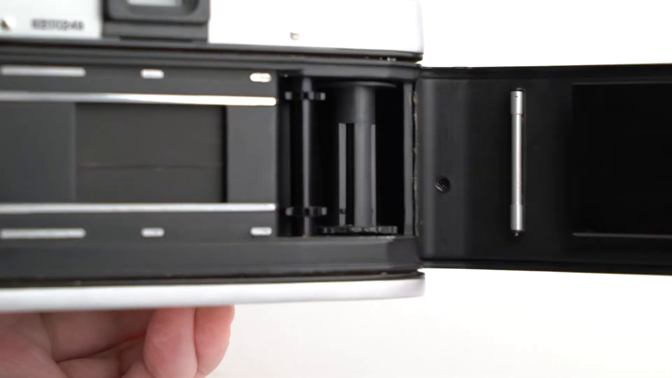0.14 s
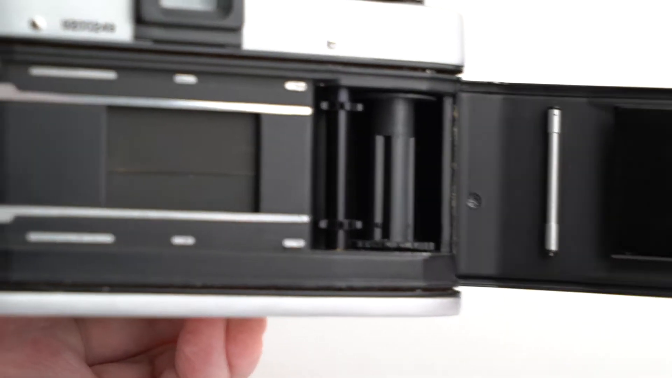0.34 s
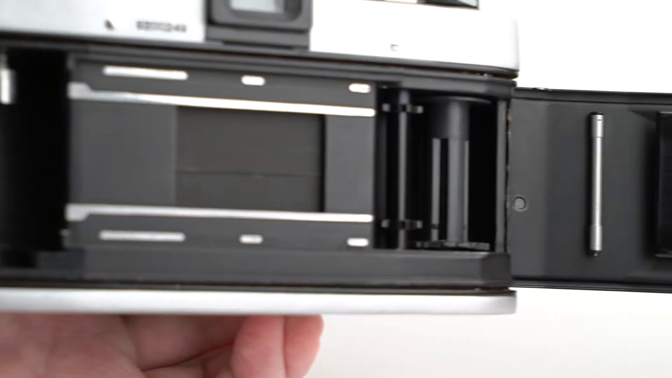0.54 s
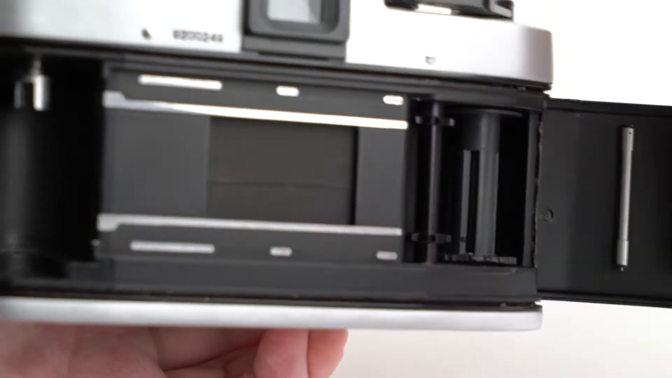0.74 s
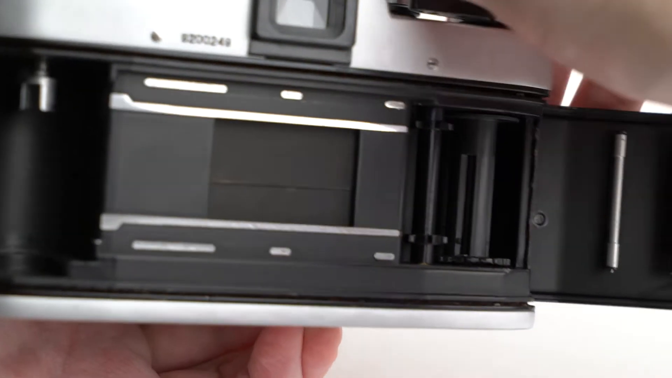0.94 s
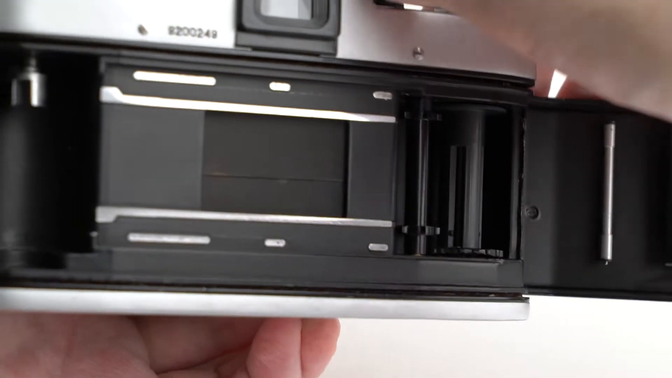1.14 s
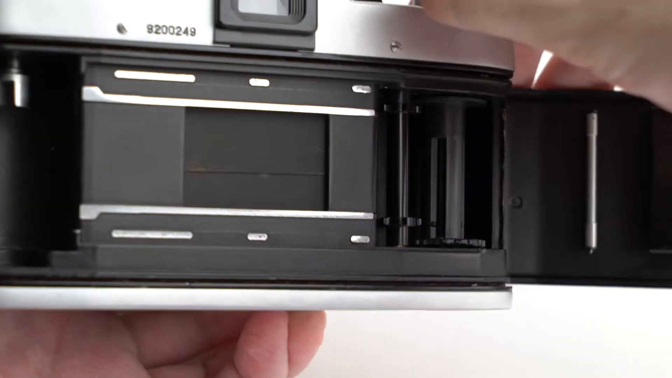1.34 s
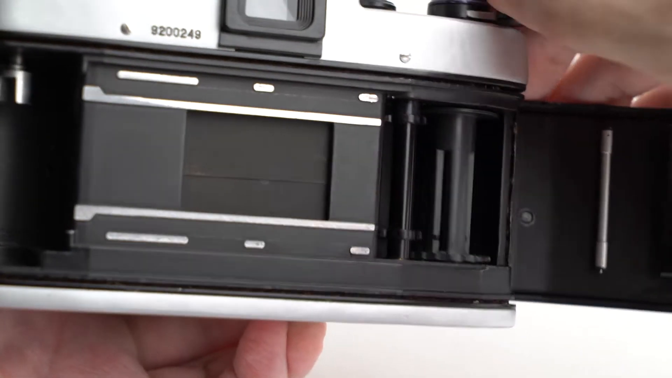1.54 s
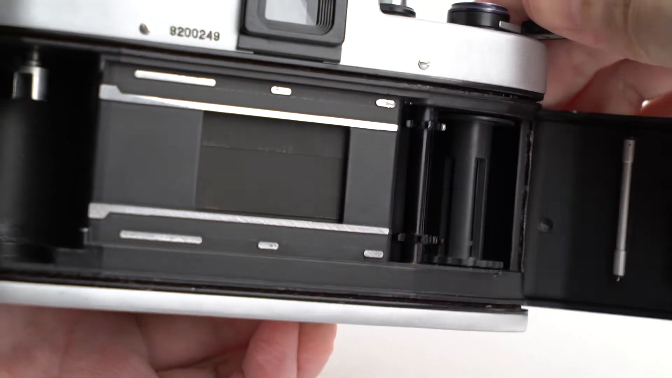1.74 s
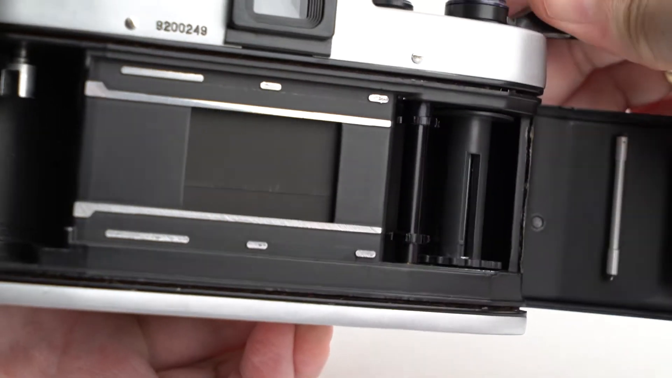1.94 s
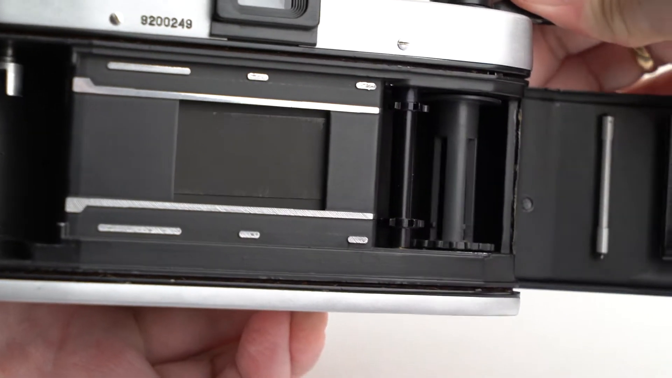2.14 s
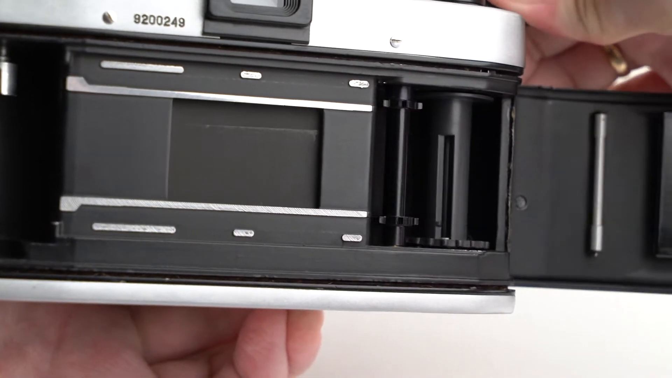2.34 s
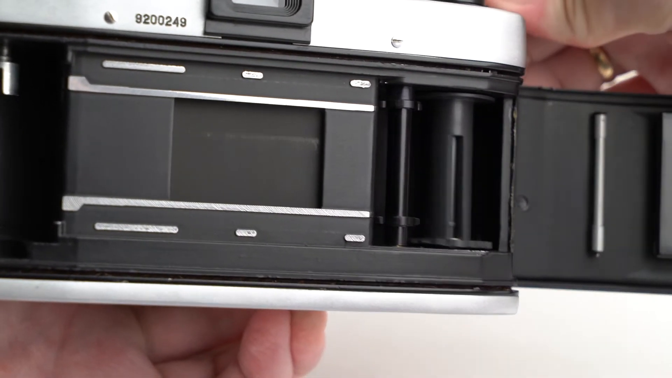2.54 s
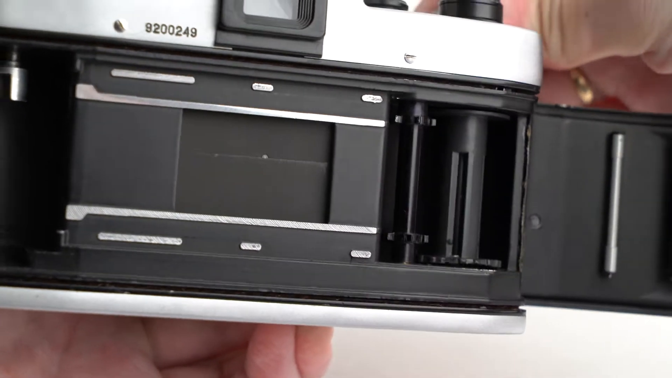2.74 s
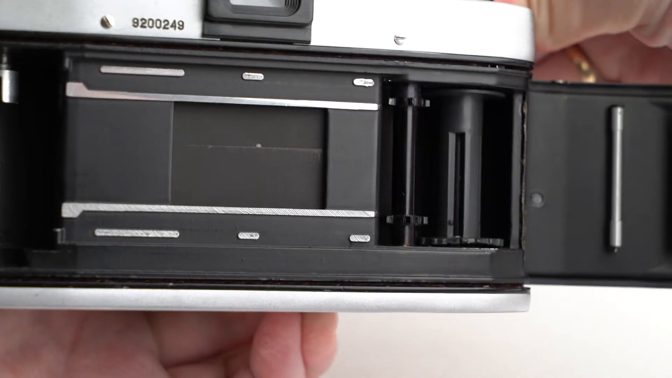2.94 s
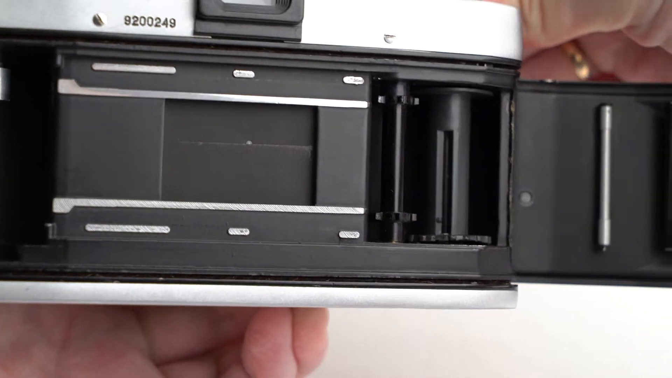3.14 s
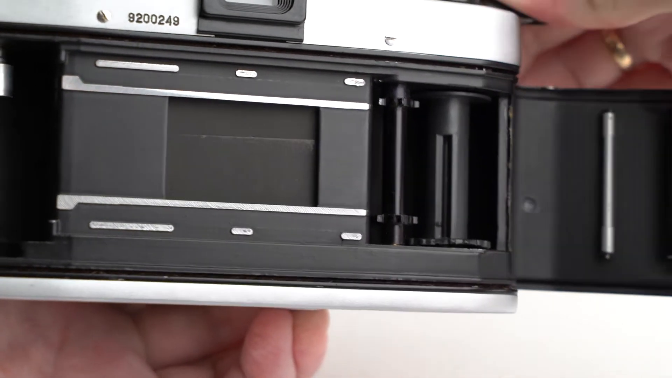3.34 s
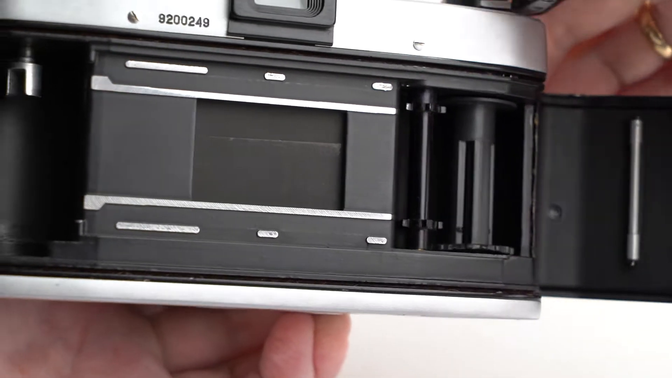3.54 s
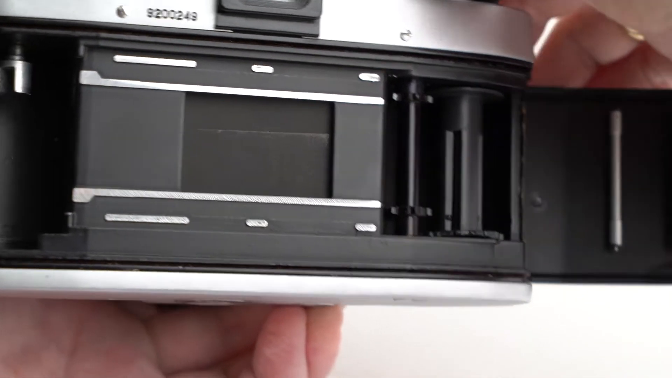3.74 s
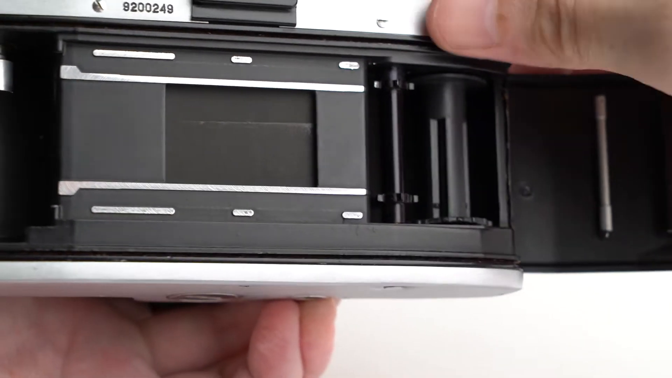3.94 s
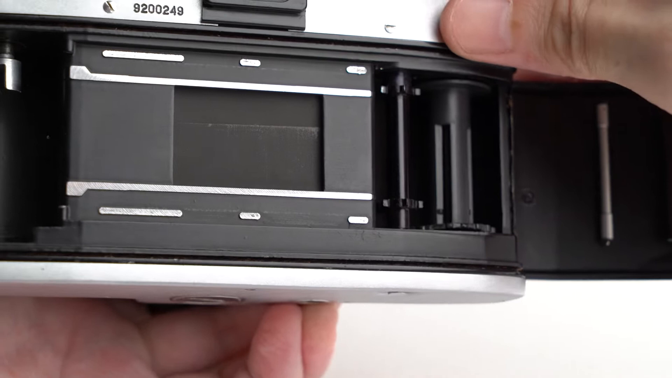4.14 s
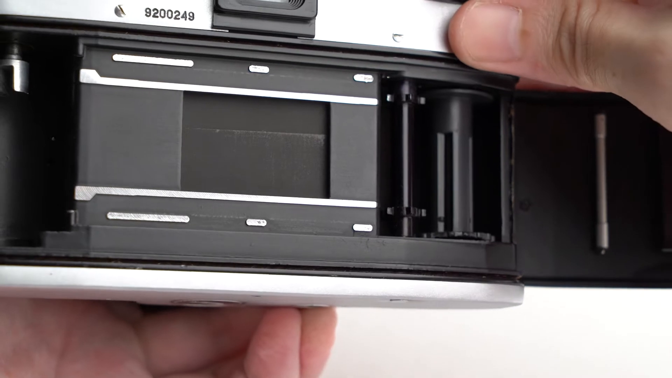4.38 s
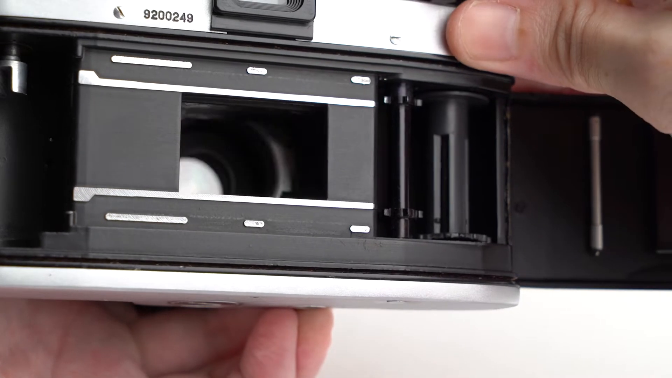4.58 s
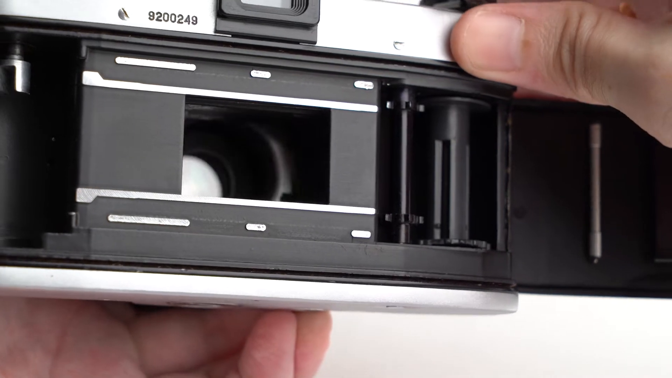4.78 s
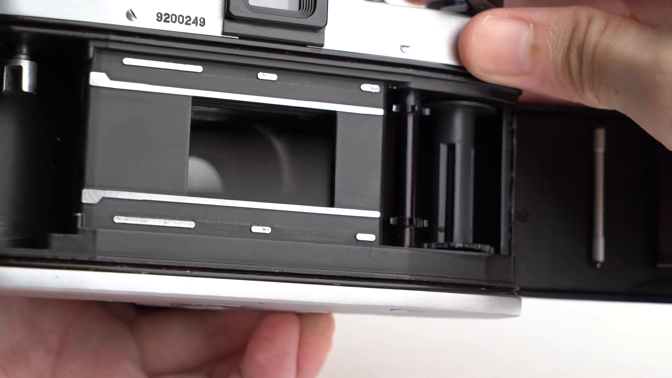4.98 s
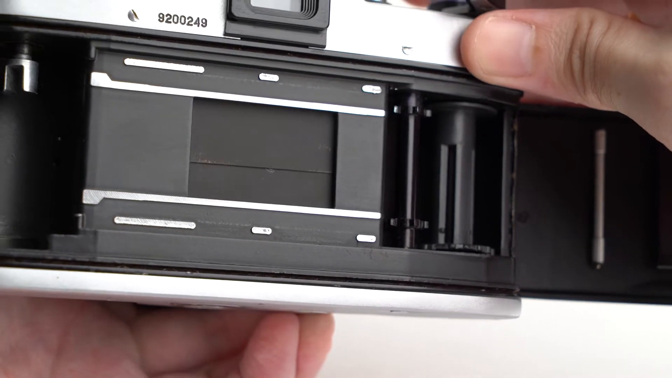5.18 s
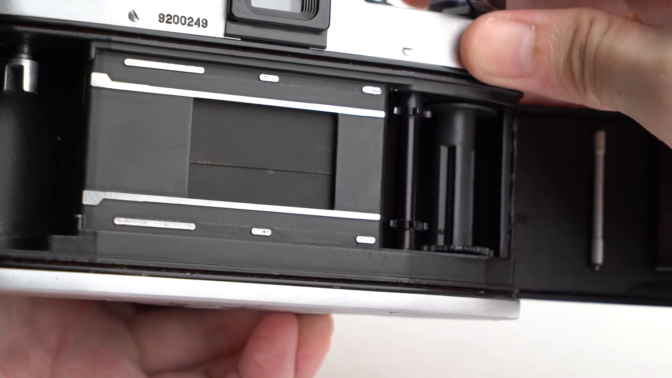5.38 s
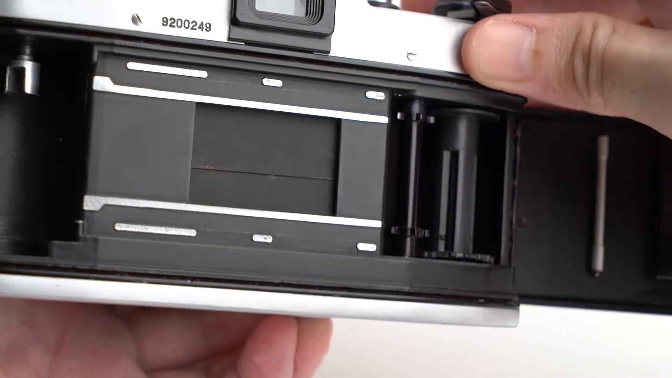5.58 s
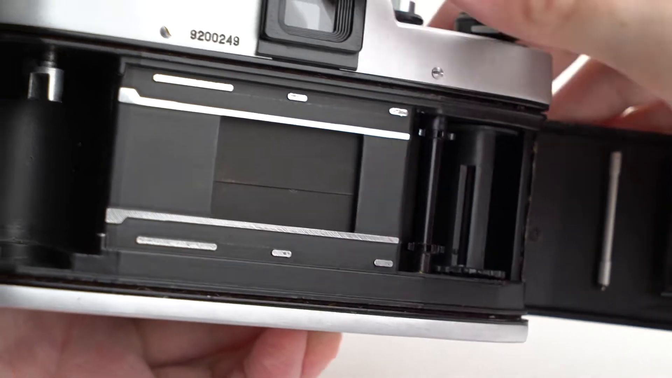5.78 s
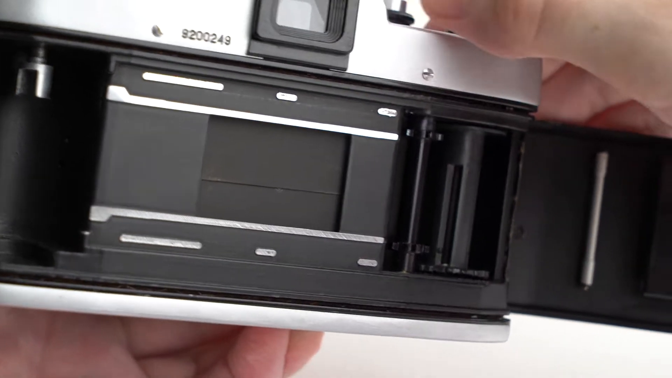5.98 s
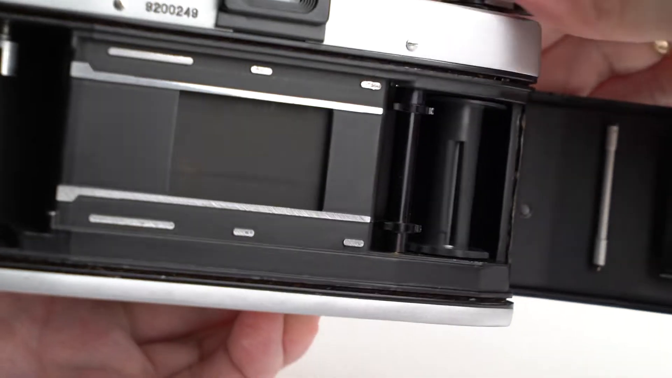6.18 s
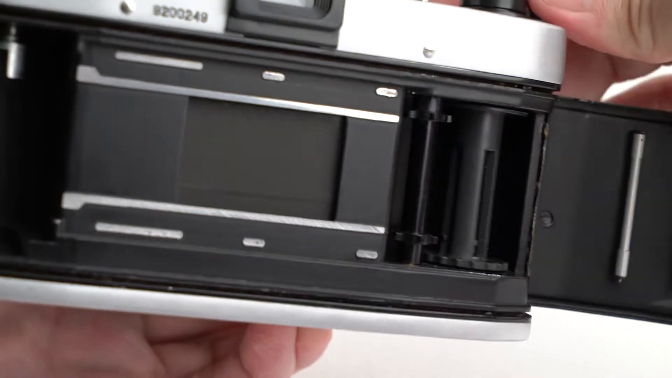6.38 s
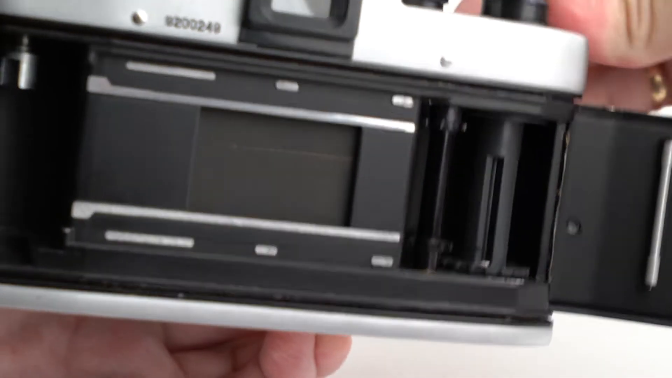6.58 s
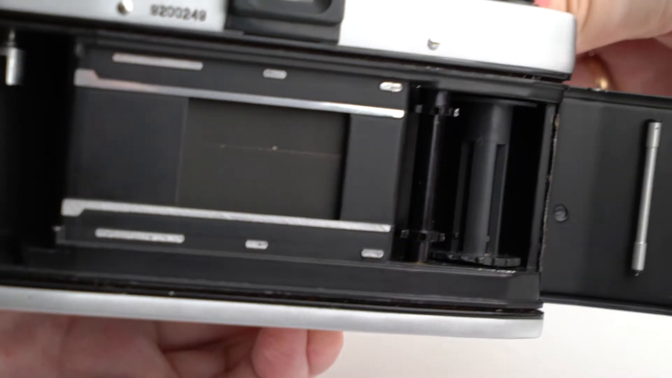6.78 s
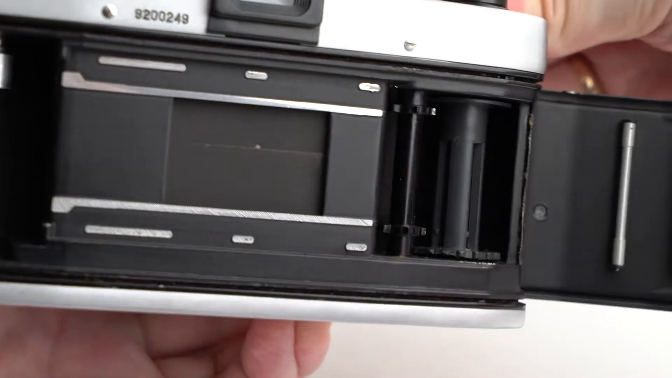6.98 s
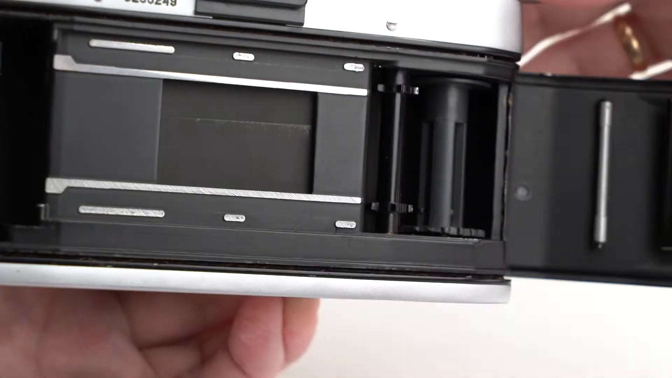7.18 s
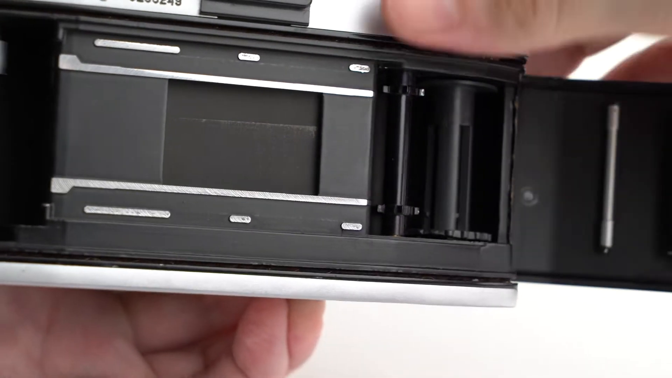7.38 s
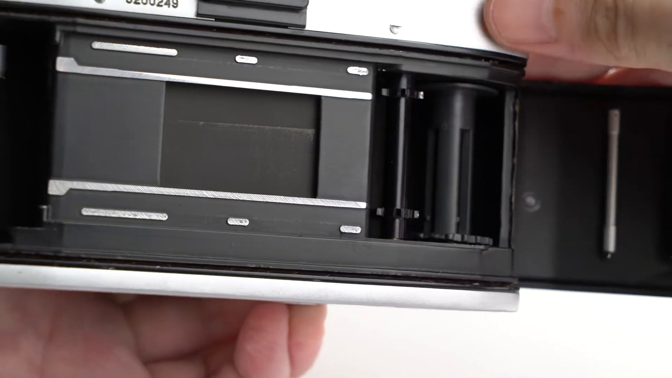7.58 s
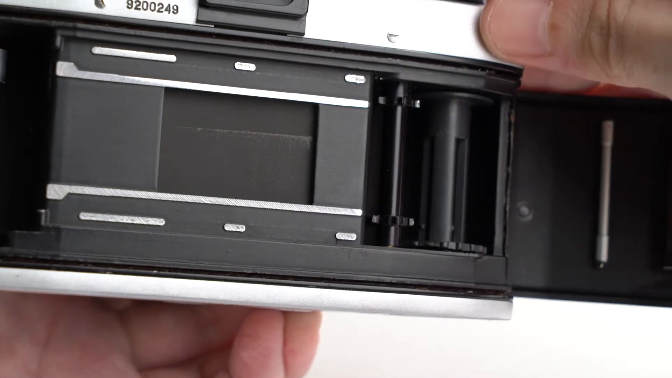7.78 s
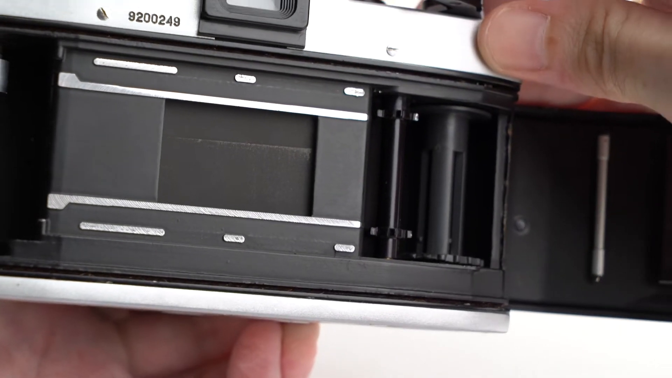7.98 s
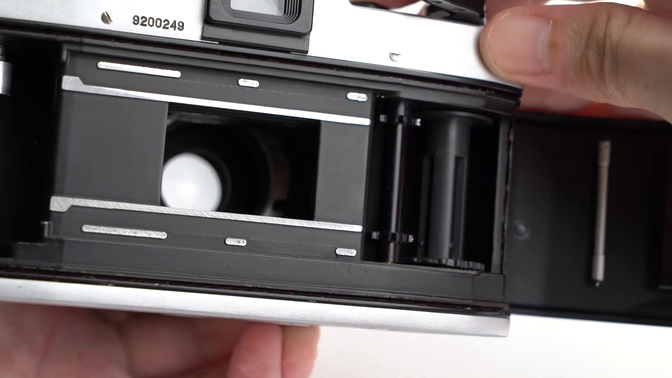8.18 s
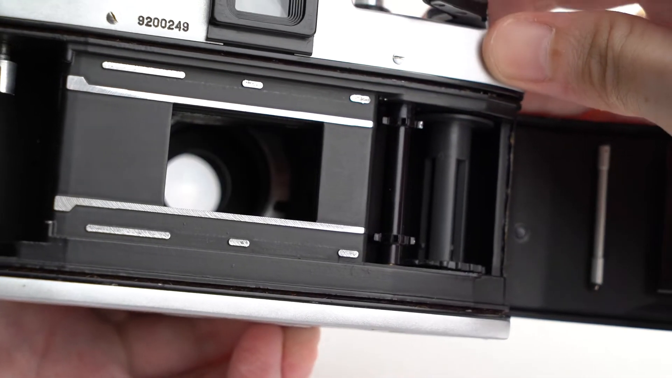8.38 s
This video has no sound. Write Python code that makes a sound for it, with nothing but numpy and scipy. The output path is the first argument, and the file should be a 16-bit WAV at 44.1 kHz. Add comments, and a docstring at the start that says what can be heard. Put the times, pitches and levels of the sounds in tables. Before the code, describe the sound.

A film camera's lever ratchets slowly, then briskly, and its shutter claps open and shut; a second wind ends with another shutter snap.

```python
"""Winding and firing a film camera

A metal film camera with its back open is wound, fired, wound and fired again, close by in a quiet, live room.
Pawl, mirror and blade clicks are noise bursts through body resonances; the lever's stop rings decaying sines.
Gears, timer and scraping are unsteady coloured noise; the spring hum and body knocks are sines.
Hands brush and tick on the body; ventilation rumbles far away as low noise under hiss."""
import sys
import numpy as np
from scipy import signal
from scipy.fft import rfft, irfft, next_fast_len
from scipy.io import wavfile
from scipy.ndimage import uniform_filter1d, map_coordinates

SR = 44100
rng = np.random.default_rng(int(sys.argv[2]) if len(sys.argv) > 2 else 0)


def bounce(signal):
    """Save signal as a 16-bit WAV file at the path given by the first command-line argument."""
    frames = np.transpose(np.atleast_2d(signal))
    limited = np.clip(frames, -1, 1)
    pcm = np.round(limited * 32767).astype(np.int16)
    wavfile.write(sys.argv[1], SR, pcm)


N = 371322  # length in samples


def amp(db):
    """dB to gain."""
    return 10 ** (np.asarray(db) / 20)


def unit(x):
    """Scaled to rms 1."""
    return x / np.sqrt(np.mean(x ** 2) + 1e-20)


def along(points, hz):
    """Reads a curve of (Hz, value) points on a log frequency axis."""
    f, value = np.transpose(points)
    return np.interp(np.log(hz + 1), np.log(f + 1), value)


def level(*tables):
    """Gain per sample, summed over tables of (s, dB); silent outside them."""
    t = np.arange(N) / SR
    return sum(amp(np.interp(t, *np.transpose(rows), left=-200, right=-200)) for rows in tables)


def run_down(rows, engage_s=.015):
    """Gain of motions that engage quickly, hold and fade at a steady rate."""
    curves = []
    for s, db, held, lost_db, fade in rows:
        end_s, end_db = s + held, db - lost_db
        curves.append([(s - engage_s, db - 40), (s, db), (end_s, end_db), (end_s + 1, end_db - fade)])
    return level(*curves)


def wobble(rate):
    """A smooth random curve with the given number of knots a second."""
    knots = rng.standard_normal(int(N * rate / SR) + 4)
    return map_coordinates(knots, [np.arange(N) * rate / SR])


def filtered(x, response):
    """Shapes x by a response given as a function of frequency."""
    m = next_fast_len(x.shape[-1] + 8192)
    return irfft(rfft(x, m) * response(np.fft.rfftfreq(m, 1 / SR)), m)[..., :x.shape[-1]]


def rush(spectrum, alike):
    """Stereo noise of rms 1, coloured by a spectrum, with a left-right likeness for each frequency."""
    def mid_and_side(hz):
        turn = np.arccos(np.clip(along(alike, hz), -1, 1)) / 2
        return amp(along(spectrum, hz)) * [np.cos(turn), np.sin(turn)]

    mid, side = filtered(rng.standard_normal((2, N)), mid_and_side)
    return unit(np.array([mid + side, mid - side]))


def resonant(x, modes, dull_hz):
    """Rings x through slightly scattered causal resonances, cut steeply below the lowest; energy becomes 1."""
    f = np.fft.rfftfreq(x.shape[-1], 1 / SR)
    response = 0
    for k, (centre, width, db) in enumerate(modes):
        gain = amp(db + 1.5 * rng.standard_normal())
        band = 1j * f * width / (centre * centre - f * f + 1j * f * width)
        response = response + (-1) ** k * gain * band  # neighbours alternate in sign
    edge = .85 * modes[0][0]
    low_cut = (-f * f / (edge * edge - f * f + 1j * f * edge)) ** 2
    treble_cut = 1 / (1 + 1j * f / dull_hz)
    y = irfft(rfft(x) * response * low_cut * treble_cut, x.shape[-1])
    return y / np.linalg.norm(y, axis=-1, keepdims=True)


# body resonances that the clicks ring through: pitch_hz, width_hz, level_db (relative)
HOUSING_MODES = [(880, 300, -3), (1080, 350, -1), (1450, 500, 0), (1900, 600, 0)]
PLATE_MODES = [(2390, 520, -1), (2820, 1310, -3), (3620, 600, 2), (4190, 2120, -4)]
SMALL_PART_MODES = [(6350, 1600, -3.5), (8470, 2360, 0), (10480, 3500, 0.5), (12860, 2600, 3.5),
                    (15270, 7700, -5.5)]


def clicks(rows, rise, snap, t60s, shared, dull_hz):
    """Contacts as a sharp snap and a rattle into housing, plates and small parts; treble leans to one side."""
    t = np.arange(4096) / SR
    out = np.zeros((2, N + len(t)))
    rattle = amp(-60 * t / np.array(t60s)[:, None, None])
    fade = (1 - np.exp(-t / rise)) ** 2 * (rattle + snap * amp(-60 * t / .012))  # snap t60 12 ms
    fade /= fade.max(axis=2, keepdims=True)
    size = np.linalg.norm(fade, axis=2)
    share = np.clip(shared, 0, 1)[:, None, None]  # part of the noise common to left and right
    for s, db, housing_db, plates_db, pan_db in rows:
        common = rng.standard_normal((3, 1, len(t)))
        separate = rng.standard_normal((3, 2, len(t)))
        noise = np.sqrt(share) * common + np.sqrt(1 - share) * separate
        groups = amp([housing_db + 3.0, plates_db - .4, 0])[:, None]
        sides = amp(np.outer([.05, .5, 1.2], [pan_db / 2, -pan_db / 2]))  # small parts lean most
        gain = amp(db - 6.0) * groups / np.linalg.norm(groups[1:]) * sides * size
        start = round((s - rise) * SR)  # begins just before the listed moment
        for g, x, modes in zip(gain, fade * noise, (HOUSING_MODES, PLATE_MODES, SMALL_PART_MODES)):
            out[:, start:start + len(t)] += g[:, None] * resonant(x, modes, dull_hz)
    return out[:, :N]


def ring(rows, modes, pan_db):
    """Each blow rings the same decaying modes at new strengths and phases, with a short noise crack."""
    t = np.arange(SR // 2) / SR
    out = np.zeros((2, N + len(t)))
    for s, db in rows:
        tone = 0
        for hz, mode_db, t60 in modes:
            fade = amp(mode_db + rng.normal(0, 1.55, (2, 1)) - 60 * t / t60)
            tone = tone + fade * np.sin(2 * np.pi * (hz * t + rng.random((2, 1))))
        crack = .8 * amp(-60 * t / .04) * np.diff(rng.standard_normal((2, len(t) + 1)))
        attack = 1 - np.exp(-t / .001)
        out[:, round(s * SR):][:, :len(t)] += amp(db) * (tone + crack) * attack
    return out[:, :N] * amp([[pan_db / 2], [-pan_db / 2]])


# level of the low drones: time_s, deep_db, upper_db
RUMBLE_LEVELS = [(0.0, -66, -59), (0.4, -56, -49.5), (0.77, -61, -55.5), (0.87, -55, -53), (1.12, -61, -57),
                 (1.52, -56.5, -55.5), (2.44, -59.5, -53), (2.67, -47.5, -53), (2.77, -63, -50),
                 (3.21, -51, -53), (4.17, -64, -58), (4.27, -52, -49), (4.59, -58, -60), (7.22, -57, -53.5),
                 (7.27, -62, -53.5), (7.76, -54, -57), (8.21, -67, -59), (8.42, -60, -52)]
# spectra of deep drone, upper drone, and room air with microphone hiss: pitch_hz, level_db (per Hz, relative)
DEEP_SPECTRUM = [(15, -44), (25, -4), (40, -5), (54, 7), (68, 5.5), (90, -65)]
DRONE_SPECTRUM = [(55, -45), (72, -12.5), (86, 4.5), (100, -2.5), (115, -4.5), (150, -19), (210, -45)]
AIR_SPECTRUM = [(76, -25), (130, -4), (176, -10), (292, -8.5), (337, -12), (505, -11.5), (658, -15),
                (874, -13.5), (1230, -13), (1570, -19), (3610, -26), (15200, -30), (16500, -46)]
# stereo width of the air: pitch_hz, likeness (left to right, 1 = same)
AIR_LIKENESS = [(60, 1.0), (180, 0.91), (550, 0.53), (1650, 0.24), (4970, 0.039), (15000, 0.14)]


def background():
    """Ventilation as two low noise drones, nearly alike on both sides, over gently wavering air."""
    s, deep_db, upper_db = np.transpose(RUMBLE_LEVELS)
    alike = [(60, .998)]
    deep = level(np.c_[s, deep_db]) * rush(DEEP_SPECTRUM, alike)
    upper = level(np.c_[s, upper_db]) * rush(DRONE_SPECTRUM, alike)
    air = amp(-54.5 + 1.41 * wobble(3.287)) * rush(AIR_SPECTRUM, AIR_LIKENESS)
    return deep + upper + air


# how long the diffuse tail rings: pitch_hz, t60_s
TAIL_T60 = [(500, 1), (1300, 0.57), (3500, 0.66), (9000, 0.4), (15000, 0.37)]
# stereo width of the tail: pitch_hz, likeness (left to right, 1 = same)
TAIL_LIKENESS = [(400, 1), (1200, 0.79), (3000, 0.0068)]
WALL_S = .015  # delay of the first strong reflection


def room(x):
    """Echo from noise tails, each frequency dying at its own speed, redrawn every quarter second."""
    out, step = np.zeros((2, N + 2 * SR)), SR // 4
    for start in range(0, N, step):
        hz, t, z = signal.stft(rng.standard_normal((2, SR * 2 // 3)), SR, nperseg=256)
        alike = np.clip(along(TAIL_LIKENESS, hz), 0, 1)[:, None]  # long waves reach both sides together
        z[1] = alike * z[0] + np.sqrt(1 - alike ** 2) * z[1]
        diffuse = amp(-60 * t / along(TAIL_T60, hz)[:, None])
        near = .7 * amp(-60 * t / .13)  # quicker near reflections
        tail = signal.istft(z * (diffuse + near), SR, nperseg=256)[1]
        wet = signal.fftconvolve(x[:, start:start + step], tail / np.linalg.norm(tail[0]), axes=1)
        out[:, start + round(WALL_S * SR):][:, :wet.shape[1]] += wet
    return out[:, :N]


# fingers on the body: start_s, level_db, housing_db and plates_db (against the small parts); all relative
FINGER_TOUCHES = [(1.2623, -51, 9, 7), (1.281, -48, 8.5, 8), (4.231, -43.5, -4, 2), (7.1014, -49, -1, 11),
                  (7.894, -46, -1, 4)]
# a finger ring touches the top plate: start_s, level_db (relative)
RING_TAPS = [(1.0917, -47.5), (1.1475, -50.5)]
# ringing of the top plate: pitch_hz, level_db (relative), t60_s
TOP_PLATE_MODES = [(3880, 3, .024), (6400, 1.5, .028), (9900, 2.5, .028)]
# a hand slides over the body: time_s, level_db
BRUSH_LEVELS = [(0, -59), (.184, -59), (.24, -56), (.36, -46.5), (.41, -46.5), (.474, -58.5), (.62, -63),
                (.68, -80)]
# colour of skin on metal: pitch_hz, level_db (per Hz, relative)
SKIN_SPECTRUM = [(880, -6), (1500, 1), (1690, -2.5), (4500, -3.5), (5540, -2), (13900, -4), (16000, -10.5)]


def hands():
    """Soft finger contacts, a ring tapping metal and one brushing stroke of noise."""
    touch = clicks([(*row, -2.5) for row in FINGER_TOUCHES], rise=.0012, snap=.3,
                   t60s=[.05, .04, .03], shared=[.9, .6, .4], dull_hz=9000)
    taps = ring(RING_TAPS, TOP_PLATE_MODES, pan_db=-5.0)
    brush = level(BRUSH_LEVELS) * rush(SKIN_SPECTRUM, [(3000, 0.13)]) * amp([[-1.2], [1.2]])
    return touch + taps + brush


# a spring hums under load: peak_s, level_db (relative), swell_db_per_s, fade_db_per_s
SPRING_LOADS = [(1.898, -55, 116, 150), (2.044, -57, 95, 92), (2.31, -59, 102, 138), (2.62, -54, 85, 900),
                (3.42, -59, 200, 5), (3.67, -47, 26, 180), (6.434, -51, 178, 175), (6.656, -49, 125, 303),
                (7.276, -41.5, 185, 400)]
SPRING_HZ = 1155  # mean pitch
SPRING_REACH_S = 0.33  # length of each swell and fade


def spring():
    """A spring under tension hums as a sine with slightly unsteady pitch and a broken level."""
    phase = 2 * np.pi * np.cumsum(SPRING_HZ + 5 * wobble(30)) / SR
    r = SPRING_REACH_S
    swells = [[(s - r, db - swell * r), (s, db), (s + r, db - fade * r)] for s, db, swell, fade in SPRING_LOADS]
    return np.sqrt(2) * level(*swells) * amp(-6 + 3.5 * wobble(14)) * np.sin(phase)


# gears spin on and run down: full_speed_s, level_db (relative), held_s, lost_db (while held), fade_db_per_s
GEAR_RUNS = [(4.64, -27, 0.078, 4, 126), (5.09, -26.5, 0.086, 3, 121), (8.25, -31.5, 0.05, -2, 72)]
# the lever grinds through the end of a stroke: same columns, full_speed_s being the full level
LEVER_GRINDS = [(3.69, -50, 0.079, 7, 76), (6.64, -42, .14, 2.5, 200), (7.36, -32.5, 0.098, 3.3, 114)]
# the escapement holds the shutter open: time_s, level_db (relative)
TIMER_LEVELS = [(4.78, -70), (4.85, -48.5), (4.93, -45.5), (5.03, -37.5), (5.05, -70)]
# colours of gear train, escapement and lever scrape: pitch_hz, level_db (per Hz, relative)
WHIRR_SPECTRUM = [(450, -23), (760, -13), (1570, 0), (2250, -0.5), (3210, 1), (3460, -2.5), (7080, 2),
                  (8350, -2), (10200, -2.5), (16000, -25)]
TICKING_SPECTRUM = [(350, -58), (600, -28), (846, 2.5), (1230, -30), (1330, -28), (1430, -10.5), (2540, 2),
                    (5710, -6.5), (12800, -5.5), (15400, -11), (16000, -44)]
SCRAPE_SPECTRUM = [(410, -62), (700, -23), (808, -24), (997, -16), (1330, -10), (1620, -12), (2460, 1.5),
                   (2730, -3), (3990, -7.5), (8420, -4), (16000, -28)]


def gears():
    """Dense, uneven contacts of gear teeth and of the sliding lever, as noise with a fast random level."""
    near = [(700, 1.0), (3000, 0.15), (15000, 0.18)]  # (Hz, left-right likeness)
    whirr = run_down(GEAR_RUNS) * unit(amp(0.89 * wobble(500) + wobble(54)) * rush(WHIRR_SPECTRUM, near))
    timer = level(TIMER_LEVELS) * unit(amp(1.07 * wobble(600)) * rush(TICKING_SPECTRUM, near))
    slide = run_down(LEVER_GRINDS) * unit(amp(wobble(330)) * rush(SCRAPE_SPECTRUM, near))
    return (whirr + timer) * amp([[-.7], [.7]]) + slide * amp([[-1.3], [1.3]])


# the lever meets its stop: start_s, level_db (relative)
STOP_BLOWS = [(2.654, -25), (2.675, -31), (2.697, -27), (3.7555, -26), (6.572, -29), (6.7408, -36),
              (6.7499, -32), (6.764, -31), (6.775, -36), (6.8196, -43), (7.5222, -25)]
# ringing of the lever: pitch_hz, level_db (relative), t60_s
LEVER_MODES = [(4500, -1.5, .07), (4440, -7, .05), (4493, -25, .5), (4517, -27, .45), (3700, -10, .025),
               (9500, -9, .035), (11650, -6, .045), (13030, -9, .06), (14800, -7, .04)]


def lever_stops():
    """The lever snaps home and rings its metal modes, to the right."""
    return ring(STOP_BLOWS, LEVER_MODES, pan_db=-8)


# a pawl drops over a ratchet tooth: start_s, level_db (relative)
PAWL_DROPS = [(1.487, -20.5), (1.5037, -22), (1.5207, -24), (1.5443, -21), (1.577, -20.5), (1.5953, -21.5),
              (1.6293, -21), (1.692, -21.5), (1.7098, -15.5), (1.723, -26), (1.784, -20), (1.8326, -23),
              (1.8511, -16), (1.8624, -28), (1.9014, -21), (1.9419, -22), (1.9734, -20), (1.9871, -20.5),
              (2.0731, -22.5), (2.1424, -22), (2.2479, -19.5), (2.271, -22.5), (2.3181, -21), (2.43, -22.5),
              (2.4799, -19), (2.5973, -20), (2.6409, -18.5), (2.6686, -20), (3.3758, -12.5), (3.3811, -16),
              (3.4767, -17), (3.5124, -8), (3.52, -15.5), (3.5442, -14), (3.5639, -8.5), (3.5755, -14),
              (3.6474, -14), (3.671, -7.5), (6.0097, -24), (6.1013, -20), (6.116, -22), (6.1312, -21),
              (6.1449, -22.5), (6.1626, -19), (6.1783, -23), (6.2222, -19.5), (6.2472, -23), (6.261, -18),
              (6.2704, -24), (6.3004, -22), (6.329, -22.5), (6.3415, -33), (6.3472, -17), (6.355, -20),
              (6.3746, -23.5), (6.3903, -22), (6.3994, -17), (6.4293, -24), (6.477, -23.5), (6.5053, -17),
              (6.5274, -21), (6.58, -21.5), (6.6029, -20), (6.6143, -13.5), (6.6303, -28), (6.6357, -14),
              (6.6832, -23), (6.6931, -17.5), (6.7013, -20), (6.7126, -18.5), (7.1758, -8.5), (7.2131, -17),
              (7.2607, -10.5), (7.2732, -17), (7.3027, -11.5), (7.3143, -11), (7.3325, -11), (7.3455, -8.5)]
# the lever takes up slack or bottoms out: start_s, level_db, housing_db (against the small parts); relative
SLACK_BLOWS = [(1.325, -41, 0), (1.3309, -28.5, 0), (1.4503, -27.5, -19), (2.6067, -17.5, -7),
               (2.6245, -19.5, -18), (2.651, -18.5, -16), (2.6597, -23, -22), (3.2935, -32, -12),
               (3.3277, -24.5, -8), (3.3419, -28, -10), (3.3515, -44, -1.5), (3.8344, -36.5, -4),
               (6.0718, -30, -16), (6.663, -31, -16), (7.1387, -23.5, -8.5), (7.149, -25.5, -4)]
# brisk strokes of the lever: from_s, to_s
QUICK_STROKES = [(3.3, 3.7), (7.1, 7.4)]
QUICK_DB = 4  # extra housing in the pawl clicks of brisk strokes
PAWL_HOUSING_DB, PAWL_PLATES_DB = -24, -8  # mean, against the small parts
PAWL_SCATTER_DB = 2  # chance from tooth to tooth
PLATES_DB, PLATES_FOLLOW = 3, 0.31  # slack: plates dB = first + second * housing dB
WIND_PAN_DB = -6  # negative leans right


def winding():
    """Ratchet teeth are thin and bright; the lever's own knocks reach the housing."""
    chance = PAWL_SCATTER_DB * rng.standard_normal((len(PAWL_DROPS), 3))
    contacts = []
    for (s, db), (housing, plates, pan) in zip(PAWL_DROPS, chance):
        brisk = any(t0 < s < t1 for t0, t1 in QUICK_STROKES)
        housing_db = PAWL_HOUSING_DB + housing + QUICK_DB * brisk
        contacts.append((s, db, housing_db, PAWL_PLATES_DB + plates, WIND_PAN_DB + pan))
    for s, db, housing_db in SLACK_BLOWS:
        contacts.append((s, db, housing_db, PLATES_DB + PLATES_FOLLOW * housing_db, WIND_PAN_DB))
    return clicks(contacts, rise=.001, snap=2.5, t60s=[.045, .045, .04], shared=[.9, .6, .45], dull_hz=30000)


# the button trips the shutter: start_s, travel_s (until the mirror lands), shake_db (added to landing jolts)
RELEASE_CUES = [(4.5896, .1828, 2.5), (8.2035, .2039, -15)]
CLOSE_S = 5.0414  # the shutter closes


def firing_order(opening, landing, closing):
    """Lays the camera's fixed sequences out at the moments of release, mirror landing and shutter closing."""
    cues = [(s, opening) for s, *_ in RELEASE_CUES]
    cues += [(s + travel, landing(shake_db)) for s, travel, shake_db in RELEASE_CUES]
    cues += [(CLOSE_S, closing)]
    return [(cue + after, *rest) for cue, steps in cues for after, *rest in steps if cue + after < N / SR]


# dull knocks of the whole body in the hand while winding: start_s, level_db (relative), pitch_hz
WINDING_KNOCKS = [(1.619, -48, 540), (1.622, -42.5, 940), (1.711, -42.5, 802), (2.625, -41, 556),
                  (2.649, -40.5, 315), (2.668, -37.5, 218), (3.326, -45, 293), (3.671, -37, 520),
                  (6.217, -43, 297), (6.222, -41, 780), (6.265, -43, 790), (6.632, -44, 510),
                  (7.172, -45, 510)]
# jolts of opening, mirror landing and closing: after_s, level_db (relative), pitch_hz
OPEN_JOLTS = [(-.0006, -40, 480), (.0134, -40, 368), (.033, -38.5, 540)]
LAND_JOLTS = [(-.0014, -38.5, 530), (.0006, -26.5, 1020), (0.019, -33, 1045)]
CLOSE_JOLTS = [(-.0004, -35.5, 387), (0.0118, -51, 335)]


def knocks():
    """The body knocks as short sines that the hand damps quickly."""
    def landing(shake_db):
        return [(s, db + shake_db, hz) for s, db, hz in LAND_JOLTS]

    t = np.arange(SR // 8) / SR
    out = np.zeros(N + len(t))
    for s, db, hz in WINDING_KNOCKS + firing_order(OPEN_JOLTS, landing, CLOSE_JOLTS):
        fade = amp(db + 1.0 - 60 * t / 0.057) * (1 - np.exp(-t / 0.00093))
        out[round(s * SR):][:len(t)] += fade * np.sin(2 * np.pi * hz * t)
    return out[:N]


# blows of opening, mirror landing and closing: after_s, level_db, housing_db and plates_db
# (against the small parts); all relative
OPENING_BLOWS = [(0, -5.5, -8.5, 3.5), (.0066, -10.5, -8, -6), (.0138, -5.5, -11, -2.5),
                 (.0242, -10.5, -9.5, -3), (.0327, -7, -20, -12)]
LANDING_BLOWS = [(-.0054, -20, -12, .5), (0, -11, -11.5, 1.8)]
CLOSING_BLOWS = [(-.0064, -27, -7, .5), (0, -7, -14, -1.5), (.0096, -15, -10, -2.5), (.0171, -13, -12, -4),
                 (.0218, -8, -20, -9), (.042, -15, -12, -5), (.0738, -15, -10, -3)]
FIRE_PAN_DB, FIRE_PAN_FOLLOW = -.6, 0.21  # the more a blow shakes the housing, the more central it sounds


def firing():
    """Mirror, blades and latches slam as hard, snappy clicks."""
    order = firing_order(OPENING_BLOWS, lambda shake_db: LANDING_BLOWS, CLOSING_BLOWS)
    blows = [(*row, FIRE_PAN_DB + FIRE_PAN_FOLLOW * row[2]) for row in order]
    return clicks(blows, rise=.0008, snap=5, t60s=[.055, .045, .035], shared=[.95, .6, .35], dull_hz=8500)


def scene():
    """The camera, its echo in the room, the hands and the background."""
    wound, fired, running, stops = winding(), firing(), gears(), lever_stops()
    send = amp([[-2.5], [-6.5]]) * wound + amp([[-2.5], [-4.5]]) * fired  # left and right dB
    send = send + amp(-15.0) * stops + amp(-5.0) * running
    camera = wound + stops + fired + running + knocks() + spring()
    return camera + room(send) + hands() + background()


def record(dry):
    """A gentle limiter ducks on loud clicks and recovers steadily; nothing passes above the band limit."""
    power = uniform_filter1d(np.max(dry ** 2, axis=0), size=88)  # 2 ms mean of the louder side
    loud_db = 10 * np.log10(np.abs(power) + 1e-12)
    recovered_db = 14 * np.arange(N) / SR  # 14 dB a second
    wanted_db = .35 * np.clip(loud_db + 18, 0, None)  # acts above -18 dB
    cut_db = np.maximum.accumulate(wanted_db + recovered_db) - recovered_db
    ducked = dry * amp(-uniform_filter1d(cut_db, size=44))
    return filtered(ducked, lambda hz: hz < 15900)


dry = scene()
out = record(dry)
bounce(out)
```